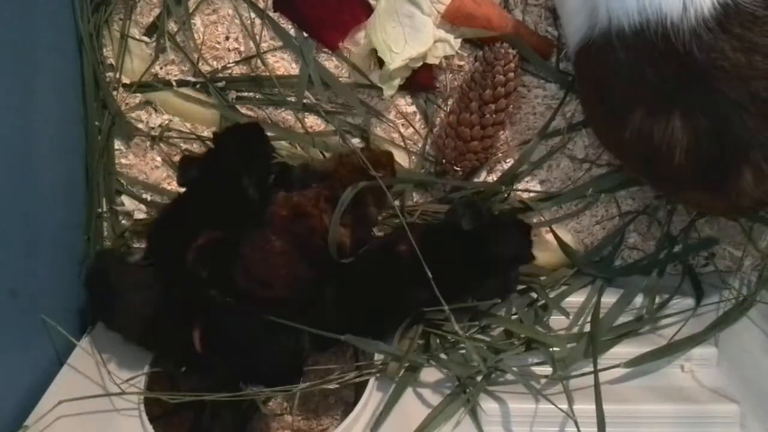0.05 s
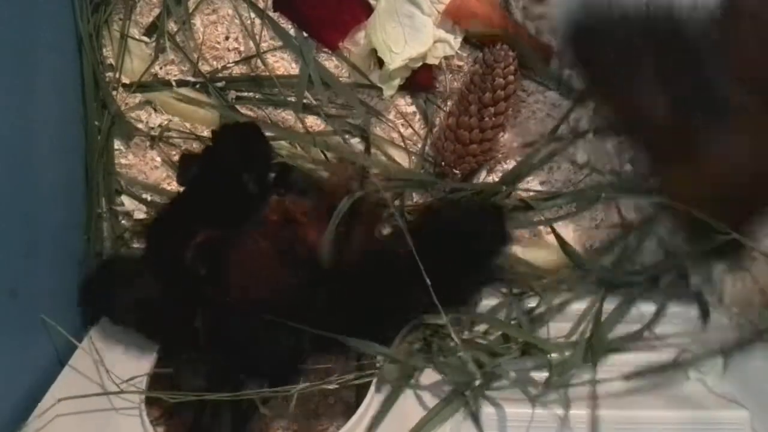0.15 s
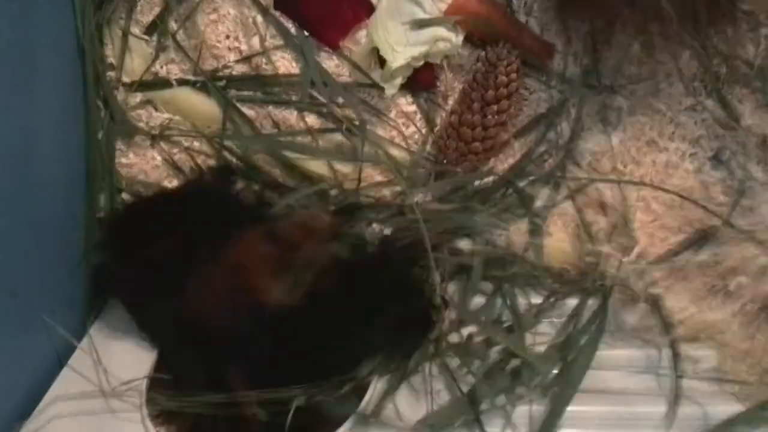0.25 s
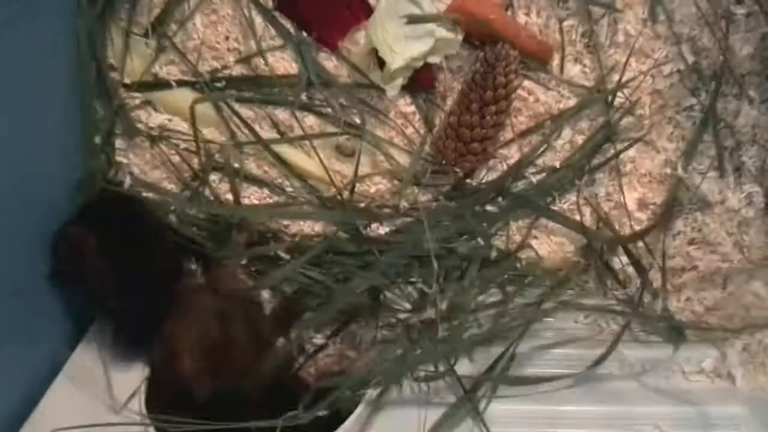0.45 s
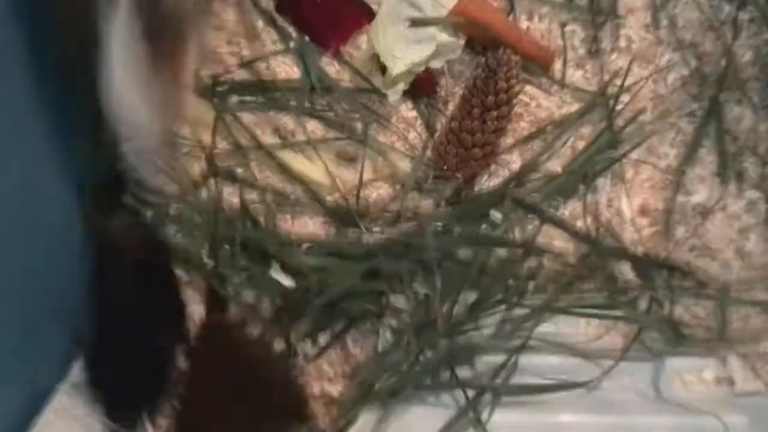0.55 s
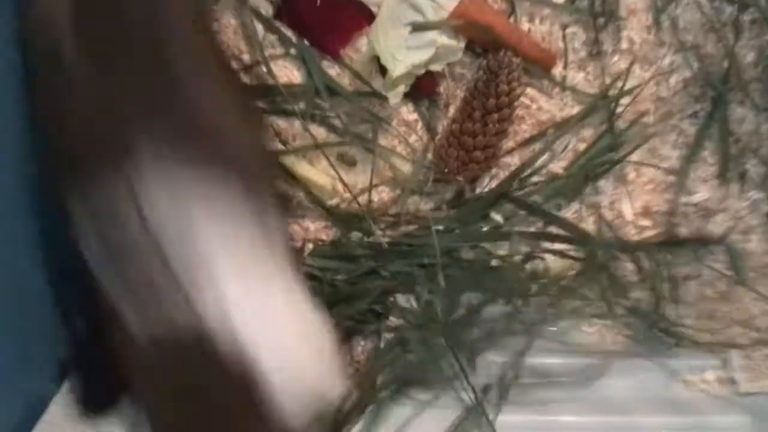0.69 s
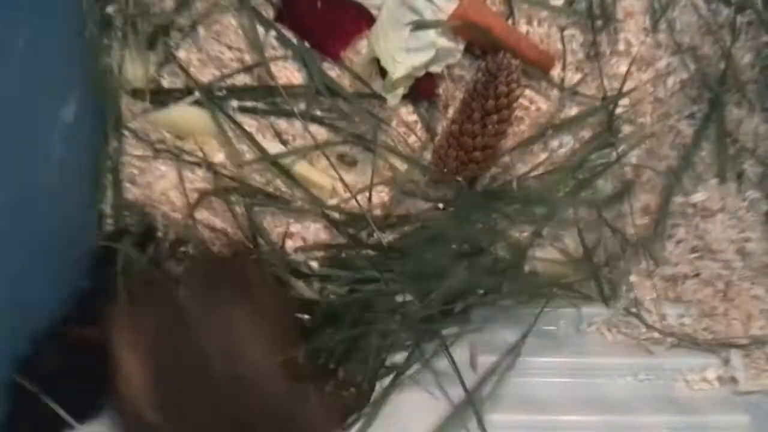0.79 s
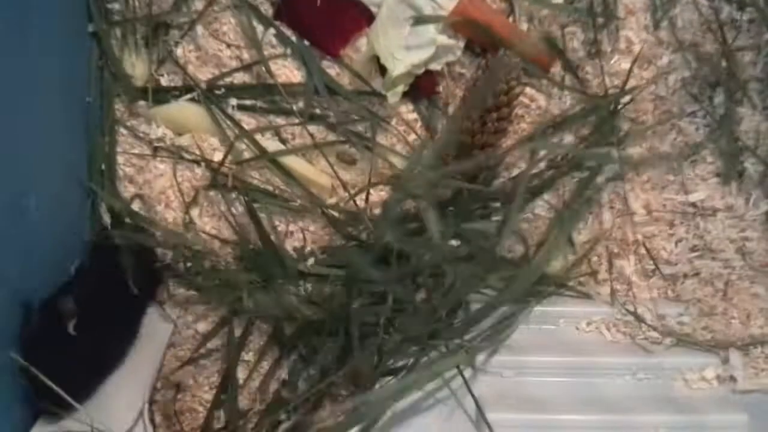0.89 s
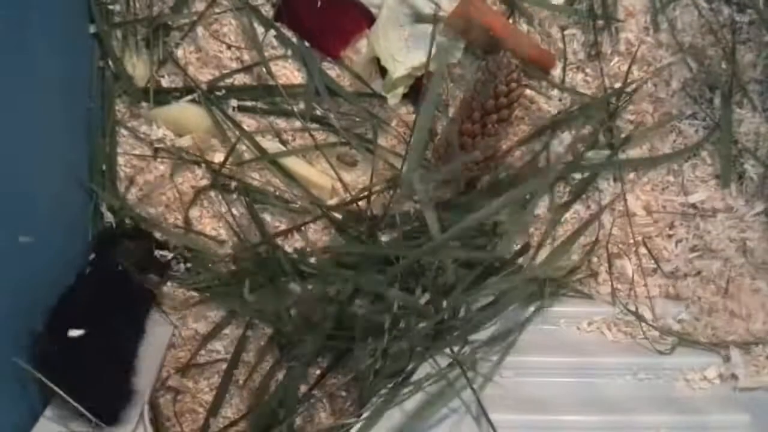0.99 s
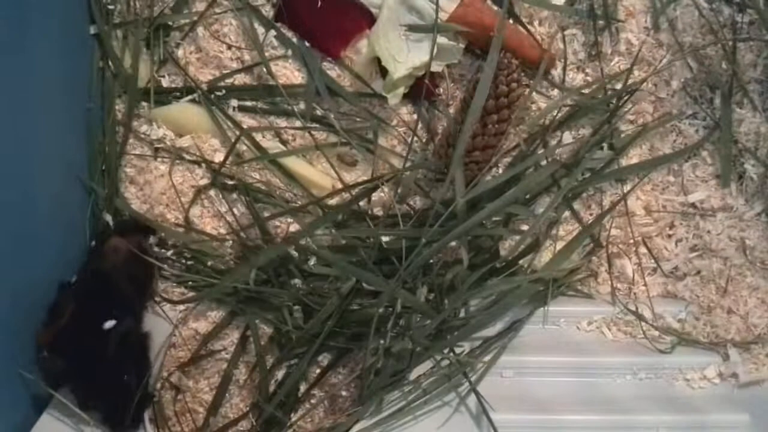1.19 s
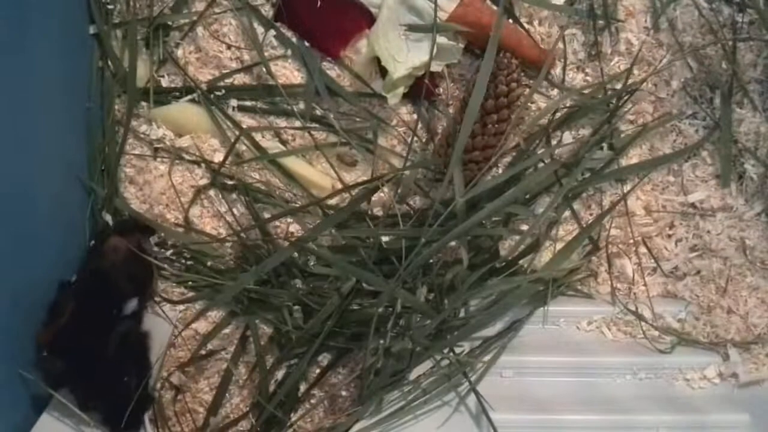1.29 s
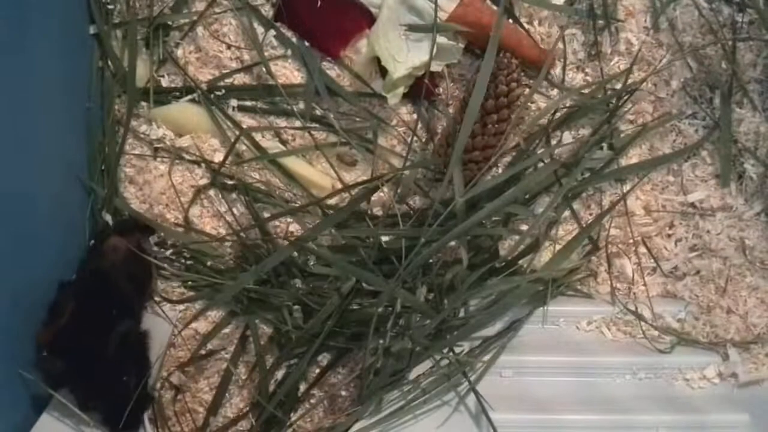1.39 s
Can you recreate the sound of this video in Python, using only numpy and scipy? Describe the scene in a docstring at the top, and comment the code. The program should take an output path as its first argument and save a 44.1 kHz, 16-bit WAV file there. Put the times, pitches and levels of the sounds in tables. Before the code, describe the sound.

A quick, close scuffle of guinea pigs in a cage breaks the quiet of a room. Feet patter and thud on a plastic tub, dry hay crackles, and the metal cage clatters and clangs before everything settles.

```python
"""Guinea pigs bolt across hay and wood shavings in a plastic-bottomed cage, heard from close by.
Dry stalks rustle and snap under them, and their feet patter and thump on the hollow floor of the tub.
Their kicks rattle the cage and leave its bars ringing; the hardest blows make the frame clang.
Behind it all is a small, quiet room with a faint hum."""
import sys
import numpy as np
from scipy import signal
from scipy.fft import rfft, irfft
from scipy.io import wavfile
from scipy.ndimage import uniform_filter1d

SR = 44100
rng = np.random.default_rng(int(sys.argv[2]) if len(sys.argv) > 2 else 0)


def to_wav(s):
    """Save 16-bit WAV."""
    ch = np.atleast_2d(s).T  # columns
    pcm = np.round(np.clip(ch, -1, 1) * 32767)  # PCM
    wavfile.write(sys.argv[1], SR, pcm.astype(np.int16))


N = 63945
T = np.arange(N) / SR

# tone of the cage when it is hit (frequency [Hz], level [dB])
CAGE_TONE = [(60, -50.5), (250, -19.5), (450, -7), (600, -2), (800, -2.5), (1150, -3), (1800, -1.5),
             (2400, -7.5), (3200, -17), (3900, -27.5), (6500, -45.5), (8000, -39.5), (10000, -37),
             (14000, -83)]


def amp(db):
    """Turn decibels into a number to multiply by."""
    return 10 ** (np.asarray(db) / 20)


def unit(x):
    """Scale a signal to an average power of 1."""
    return x / np.sqrt(np.mean(x ** 2) + 1e-20)


def curve(table, column=1):
    """Loudness over time, gliding between the dB values in a table."""
    rows = np.array(table)
    return amp(np.interp(T, rows[:, 0], rows[:, column]))


def ring(x, response):
    """Make every sample of x set off the given response."""
    return signal.fftconvolve(np.atleast_2d(x), np.atleast_2d(response), axes=-1)[:, :N]


def colour(x, tone, tilt_db=0, size=2048):
    """Filter x to a tone table; tilt_db per octave brightens or dulls it above about 1 kHz."""
    octave = np.log2(np.maximum(np.fft.rfftfreq(size, 1 / SR), 1))
    rows = np.array(tone)
    tone_db = np.interp(octave, np.log2(rows[:, 0]), rows[:, 1])
    gain = unit(amp(tone_db + tilt_db * np.maximum(octave, 10)))
    cepstrum = irfft(np.log(gain))
    one_sided = np.r_[cepstrum[0], 2 * cepstrum[1:size // 2]]  # so nothing sounds before its hit
    return ring(x, irfft(np.exp(rfft(one_sided, size))))


def spread(pair):
    """Mix two unrelated signals into left and right: bass in the centre, the low middle wide."""
    # stereo width (frequency [Hz], side level against middle [dB])
    width = [(60, -17), (120, -19), (220, -10), (380, 2.5), (600, 7), (1200, 0), (2500, 1), (12000, -1)]
    rows = np.array(width)
    log_hz = np.log(np.fft.rfftfreq(2 * N, 1 / SR) + 1)
    side_gain = amp(np.interp(log_hz, np.log(rows[:, 0]), rows[:, 1]))
    middle, side = rfft(pair, 2 * N) / np.sqrt(1 + side_gain ** 2)
    return irfft(np.array([middle + side_gain * side, middle - side_gain * side]))[:, :N]


def clicks(per_s, spread_db):
    """Tiny random hits of uneven size, on two channels with separate random signs."""
    hit = rng.random(N) < per_s / SR
    sizes = amp(spread_db * np.minimum(rng.exponential(size=N), np.pi))
    return unit(hit * sizes * rng.choice([-1, 1], (2, N)))


def mode(hz, fade_s, phase=0):
    """One ringing note; its fade time is how long it takes to drop by 60 dB."""
    return np.sin(2 * np.pi * hz * T + phase) * np.exp(-np.log(1000) * T / fade_s)


def flutter(per_s):
    """A random wobble, roughly 1 in size."""
    return np.interp(T * per_s, np.arange(400), rng.standard_normal(400))


def tail(fade_s):
    """Countless echoes blurred into fading noise."""
    echoes = rng.standard_normal((2, N)) * np.exp(-np.log(1000) * T / fade_s)
    echoes *= 1 - np.exp(-T / 0.0027)
    return echoes / np.sqrt(np.sum(echoes ** 2) / 2)


def room_air():
    """The soft, steady noise of the room, with a faint low hum."""
    # tone of the air (frequency [Hz], level [dB])
    air_tone = [(18, -18), (30, 11), (48, -47), (147, 5), (228, -8.5), (905, -6), (1030, -16), (3150, -13),
                (6200, -50), (13200, -34), (15000, -24)]
    air_db, hum_db, hum_hz = -67, -73, 142
    air = amp(air_db) * spread(colour(rng.standard_normal((2, N)), air_tone))
    return air + amp(hum_db) * np.sin(2 * np.pi * hum_hz * T)


def rustling_bedding():
    """Hay and shavings crackle under the feet, and single stalks snap."""
    # stirring of the bedding (time [s], crisp treble level [dB], stalk level [dB])
    stirring = [(0, -80.5, -68.5), (.176, -88.5, -74.5), (.2, -49.5, -41.5), (.242, -53.5, -41.5),
                (.272, -50, -46.5), (.335, -53, -48), (.375, -59, -51), (.41, -50, -38.5),
                (.52, -59.5, -51.5), (.57, -48.5, -41), (.605, -56, -38.5), (.64, -61, -50),
                (.70, -49.5, -38.5), (.74, -58.5, -54.5), (.775, -53.5, -38), (.88, -61, -45.5),
                (.94, -60, -52.5), (.99, -51.5, -40), (1.03, -53, -48), (1.06, -64.5, -56.5),
                (1.18, -73.5, -62), (1.45, -78.5, -68)]
    # stalks breaking (time [s], crack level [dB], crisp treble level [dB], decay time [s])
    snaps = [(.2010, -55, -58, 0.0012), (0.205, -50, -34.5, 0.0018), (.2550, -17, -40, 0.0013),
             (0.2587, -19.5, -30.5, 0.0017), (0.2603, -18, -31.5, 0.0022), (0.3962, -49, -37, 0.0025),
             (.574, -51, -47, 0.0027), (0.6524, -33.5, -41, 0.019), (0.695, -46, -50, 0.013),
             (0.7618, -26.5, -43.5, 0.0065), (0.815, -29, -54, 0.0068), (1.153, -50, -63, .005),
             (1.258, -53, -65, 0.015)]
    # tone of a cracking stalk (frequency [Hz], level [dB])
    stalk_tone = [(100, -54.5), (400, 2), (650, -0.5), (1100, 9.5), (1600, -3), (2050, -1.5), (2500, -2.5),
                  (3000, 2), (3700, -4.5), (5400, -11.5), (7000, -25.5), (10000, -24), (14000, -56)]
    # tone of the crisp treble of dry bedding (frequency [Hz], level [dB])
    crisp_tone = [(1000, -28), (5000, -22), (7800, -9.5), (8900, 1), (10000, 4.5), (11200, -2.5),
                  (12500, -17.5), (14500, -26)]
    crisp = clicks(per_s=4000, spread_db=3) * curve(stirring, column=1)
    stalks = clicks(per_s=4000, spread_db=3) * curve(stirring, column=2)
    for start, crack_db, crisp_db, decay_s in snaps:
        fibres = rng.standard_normal((2, N)) * (T >= start) * np.exp(-np.abs(T - start) / decay_s)
        stalks += amp(crack_db) * fibres
        crisp += amp(crisp_db) * fibres
    lean_right = amp([[-3], [3]])
    return spread(colour(stalks, stalk_tone)) + lean_right * spread(colour(crisp, crisp_tone))


def pattering_feet():
    """Light, quick steps drum on the hollow plastic tub."""
    # strength of the steps (time [s], level [dB])
    running = [(0, -90), (.19, -67.5), (.21, -55), (.255, -42), (.27, -35), (.33, -39.5), (.40, -33),
               (.52, -43.5), (.61, -35), (.76, -38.5), (.92, -36), (1.02, -32.5), (1.12, -48.5),
               (1.18, -49.5), (1.45, -55.5)]
    # notes of the tub floor (pitch [Hz], level [dB], fade time [s])
    tub_notes = [(68, -35, 0.11), (132, -13, 0.42), (196, -5.5, 0.06), (258, -3.5, 0.14),
                 (291.4, -3.5, 0.11), (330, 0, .08), (409, -1.5, 0.036), (519.3, -3, 0.063)]
    tub = sum(amp(db) * mode(hz, fade_s) for hz, db, fade_s in tub_notes)
    steps = clicks(per_s=260, spread_db=1.5) * curve(running)
    return spread(ring(steps, tub / np.sqrt(np.sum(tub ** 2))))


def rattling_cage():
    """Each kick sets off a burst of clacks, which also shakes the bars."""
    # kicks against the cage (time [s], length [s], level [dB], brightness [dB per octave])
    kicks = [(0.2013, 0.0076, -34, -8), (0.25, 0.0042, -34, 5.5), (0.365, 0.014, -36.5, -7),
             (0.382, 0.029, -22.5, -3.5), (0.422, 0.056, -32, -10.5), (0.589, 0.022, -25.5, 2.1),
             (0.648, 0.022, -24.5, 2.6), (0.702, 0.063, -35, -3.5), (0.757, 0.012, -28.5, 4),
             (0.788, 0.015, -28.5, 0), (0.81, 0.029, -25, 2.35), (0.863, .09, -38.5, -9),
             (0.969, 0.12, -45, -5)]
    attack_s, release_s = 0.002, 0.009
    clacks = clicks(per_s=1800, spread_db=4)
    clacks /= np.sqrt(uniform_filter1d(clacks ** 2, SR // 200, axis=1) + 0.029)  # even out the level
    rattle, shake = 0, 0
    for start, length, db, tilt_db in kicks:
        rise = np.clip((T - start) / attack_s, 0, 1)
        fall = np.exp(-np.maximum(T - start - length, 0) / release_s)
        burst = amp(db) * rise * fall * clacks
        rattle += colour(burst, CAGE_TONE, tilt_db)
        shake += burst
    return spread(rattle) + ringing_bars(shake)


def ringing_bars(shake):
    """Loose bars ring on in sets of six, slightly out of tune, so they beat and flutter."""
    # notes of the bars (pitch [Hz], level [dB], fade time [s])
    bar_notes = [(378, -7, 3.0), (755, -3.5, 1.65), (908, -2, 0.67), (1040.6, -6.5, 2.1), (1124, 1, 0.95),
                 (1180, 3.5, 1.2), (1240, -2, 1.7), (1317, 1.5, 1.3), (1715, -1.5, 0.95), (1762, 1, 1.11),
                 (1854, -10.5, 2.44), (1906, -10, 1.47), (2582, -8.5, 1.72), (3360, -13.5, 1.23)]
    bars_db, side_db, flutter_db = -60.5, -3, 5.5
    detune = 0.01109  # largest share by which a bar is off pitch
    bars = 0
    for hz, db, fade_s in bar_notes:
        bar_set = sum(mode(hz * (1 + detune * offset), fade_s, np.pi * np.array([[phase_a], [phase_b]]))
                      for offset, phase_a, phase_b in rng.uniform(-0.996, 1, size=(6, 3)))
        bars += amp(db + flutter_db * flutter(per_s=45)) * ring(shake, bar_set)
    middle, side = bars
    return amp(bars_db) * (middle + amp(side_db) * side * np.array([[1], [-1]]))


def thumping_feet():
    """Heavy steps knock the tub and make its whole floor boom."""
    # heavy steps (time [s], level [dB], pitch [Hz], fade time [s])
    footfalls = [(0.26, -12, 270, 0.018), (0.27, -29, 125.5, 0.19), (0.308, -31, 285, 0.053),
                 (0.591, -25.5, 162, 0.083), (0.665, -21, 290, .05), (.867, -22, 293, 0.11),
                 (0.882, -26, 329, 0.11), (0.8888, -18, 260.7, 0.12), (0.919, -26.5, 126, 0.074),
                 (0.9782, -13, 258, 0.051), (0.996, -21, 200, 0.046), (1.014, -18.5, 278, 0.045),
                 (1.058, -32, 270, 0.073), (1.099, -30.5, 126, 0.085), (1.214, -41, 215, 0.06)]
    attack_s = 0.0019
    rise = 1 - np.exp(-(T / attack_s) ** 2)
    boom = amp(-15.5) * mode(hz=125.7, fade_s=0.13)
    thumps = np.zeros(N)
    for start, db, hz, fade_s in footfalls:
        knock = (mode(hz, fade_s) + boom) * rise
        thumps += amp(db) * np.interp(T - start, T, knock, left=0)
    return thumps


def clanging_frame():
    """The hardest blows knock the cage frame: a crack and a short clang."""
    # blows on the frame (time [s], level [dB], brightness [dB per octave])
    blows = [(0.35, -12, -14), (.385, 1.5, -2), (0.395, -1.5, -2.5), (0.406, -8, 0), (.455, -16, 6.5),
             (.593, -6.5, -1), (0.6571, -9, -10), (0.762, -28, -19), (0.819, -12, 7.5), (.835, -10.5, 1)]
    # notes of the frame (pitch [Hz], level [dB], fade time [s])
    frame_notes = [(565, -8, 0.094), (870, 0, 0.15), (1115, 1.5, 0.062), (1233, -2, 0.19),
                   (1358, 5.5, 0.062), (1500, -6.5, 0.17), (1845, 6.5, 0.045), (2350, -15, 0.038)]
    clang_db, crack_db, crack_decay_s = -37, -16, 0.0012
    knocks = 0
    for start, db, tilt_db in blows:
        clang = sum(amp(note_db) * mode(hz, fade_s, rng.uniform(-np.pi, np.pi, (2, 1)))
                    for hz, note_db, fade_s in frame_notes)
        crack = rng.standard_normal((2, N)) * np.exp(-T / crack_decay_s)
        blow = amp(db) * (np.arange(N) == int(start * SR))
        knock = ring(blow, amp(clang_db) * clang + amp(crack_db) * crack)
        knocks += colour(knock, CAGE_TONE, tilt_db)
    return spread(knocks)


def walls_and_mesh(x):
    """The walls send back a short, dull echo; the wire mesh shimmers for longer."""
    # tone of the wire mesh (frequency [Hz], level [dB])
    mesh_tone = [(100, -22), (250, -7), (500, 5), (800, 1.5), (1300, -4.5), (2000, -7), (3200, -9),
                 (6000, -38), (14000, -46)]
    walls_db, mesh_db, dull_above_hz = -5, -21.5, 4500
    dulling = signal.butter(1, dull_above_hz, fs=SR, output="sos")
    walls = amp(walls_db) * signal.sosfilt(dulling, tail(fade_s=0.33))
    mesh = amp(mesh_db) * colour(tail(fade_s=1.51), mesh_tone)
    return spread(ring(x, walls + mesh))


def scene():
    """Cage and bedding with their echo, plus the feet, over quiet room air."""
    scuffle = rattling_cage() + clanging_frame() + rustling_bedding()
    return room_air() + scuffle + walls_and_mesh(scuffle) + pattering_feet() + thumping_feet()


def record(dry):
    """Thin out the deep bass and cut off the highest treble."""
    low_cut_hz, top_hz = 110, 14300
    thinned = signal.sosfilt(signal.butter(1, low_cut_hz, "high", fs=SR, output="sos"), dry)
    return signal.sosfilt(signal.ellip(8, .2, 70, top_hz, fs=SR, output="sos"), thinned)


dry = scene()
out = record(dry)
to_wav(out)
```